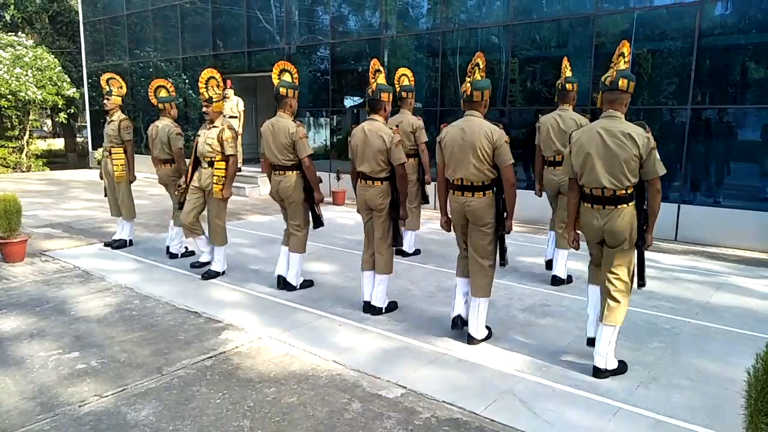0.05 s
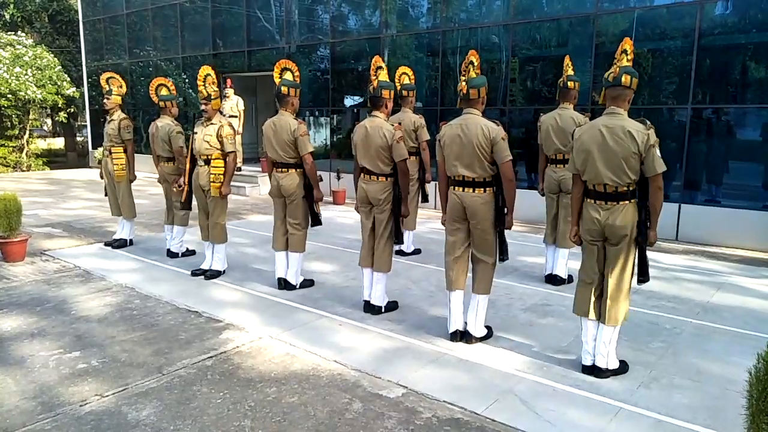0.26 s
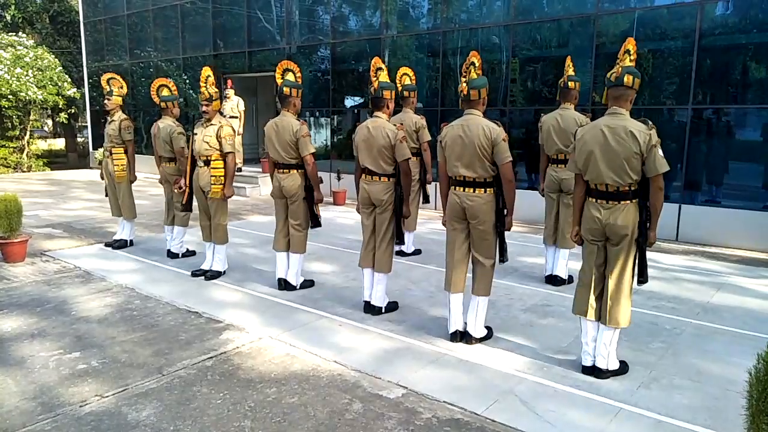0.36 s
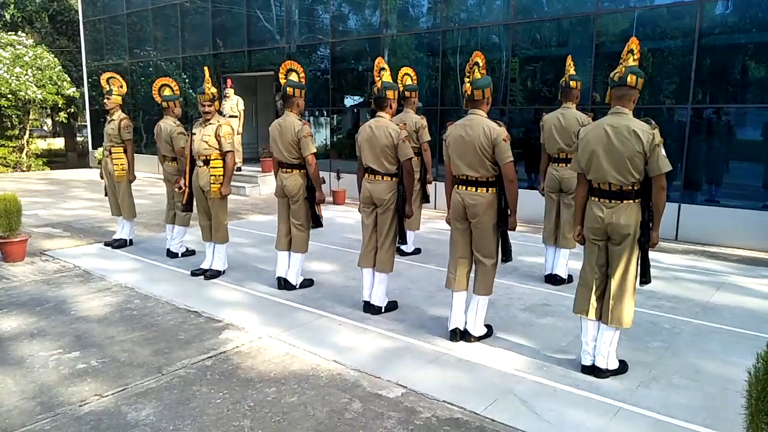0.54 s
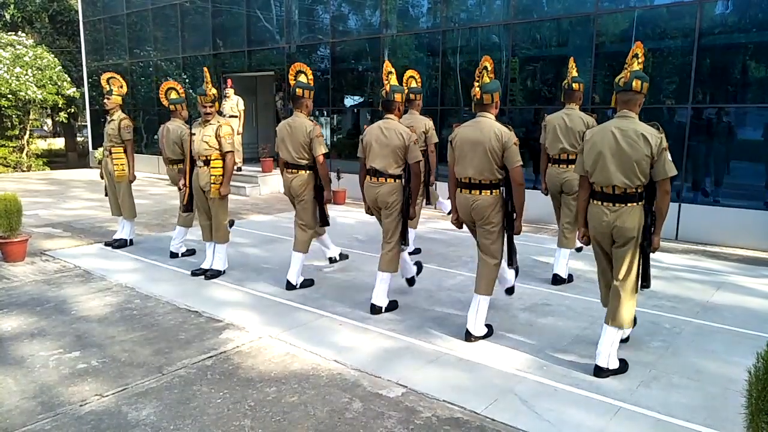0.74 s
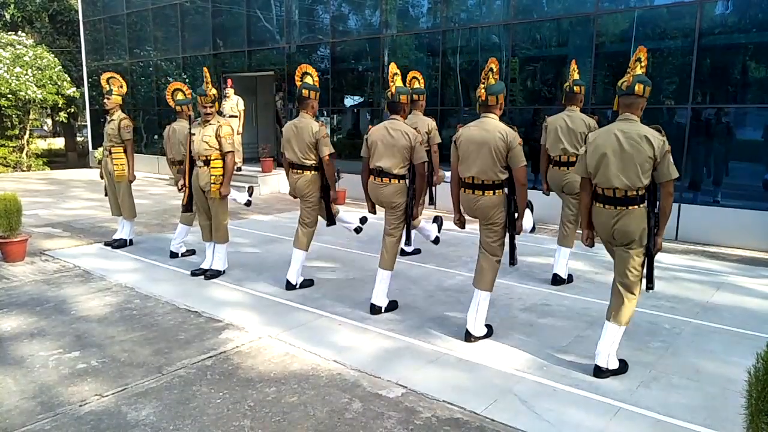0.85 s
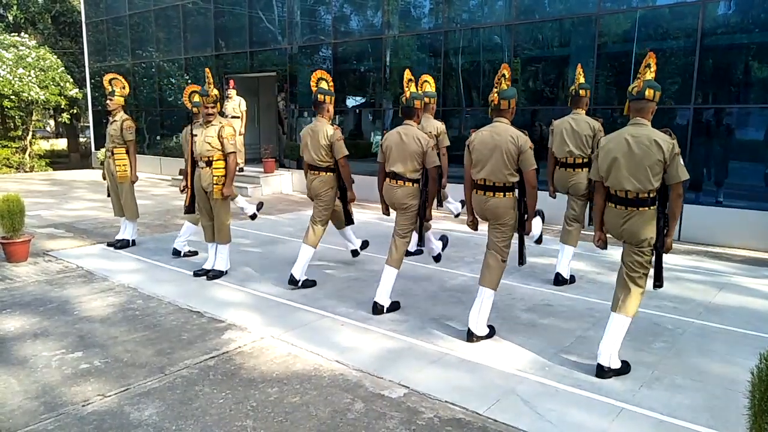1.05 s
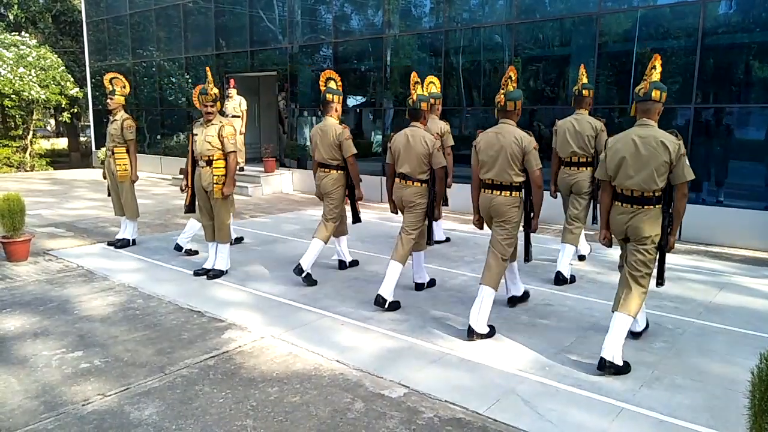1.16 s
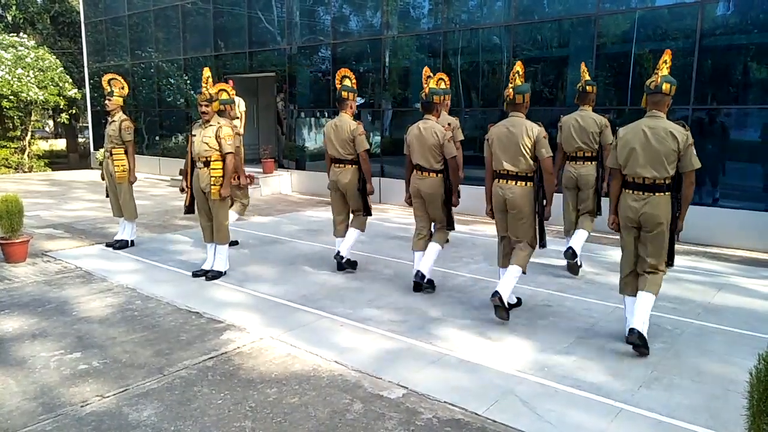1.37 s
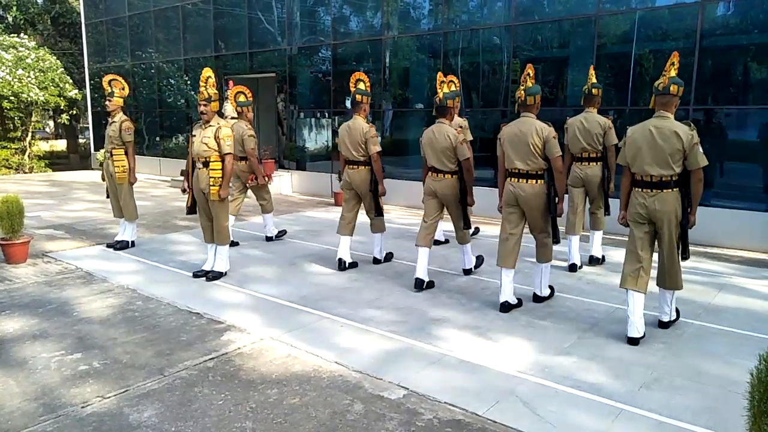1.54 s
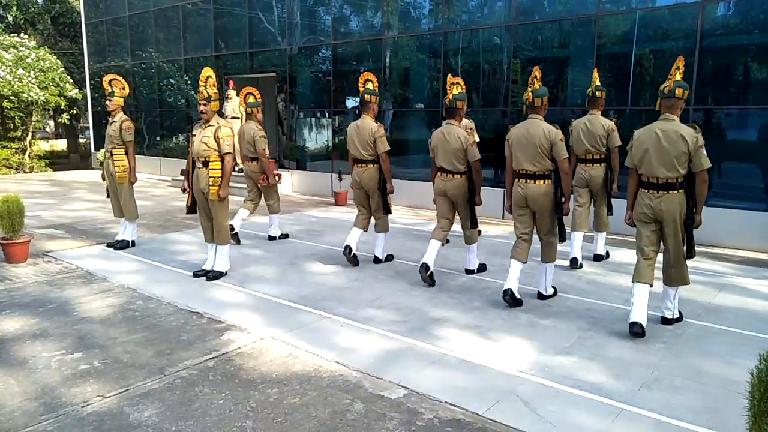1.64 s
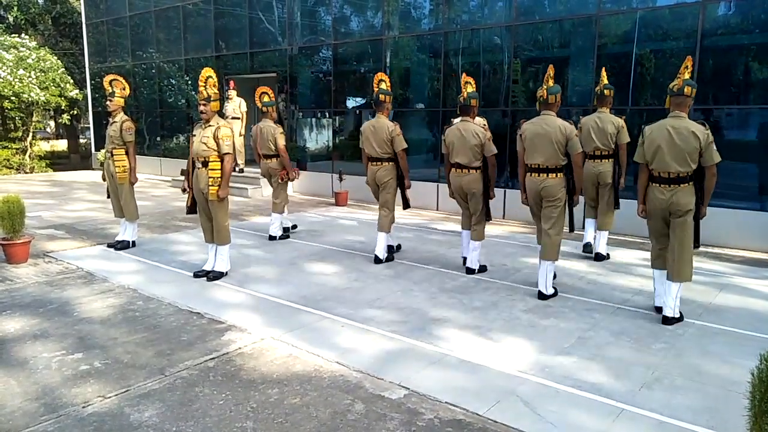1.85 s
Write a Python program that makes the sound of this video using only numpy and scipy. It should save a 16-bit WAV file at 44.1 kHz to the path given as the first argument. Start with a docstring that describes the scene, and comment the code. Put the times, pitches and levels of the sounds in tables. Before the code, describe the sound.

Two sharp group boot stamps ring across an outdoor yard, followed by soft footsteps.

```python
"""Drill squad on a paved yard

The squad stamps twice, boots landing milliseconds apart; each sole thuds, claps and cracks.
A glass front throws the stamps back and the yard rings on. Lighter steps, scuffs and a chink of
metal follow as the squad moves off, over a low outdoor rumble and a distant bird."""
import sys
import numpy as np
from scipy import signal
from scipy.fft import rfft, irfft, next_fast_len
from scipy.io import wavfile
from scipy.ndimage import uniform_filter1d

SR = 44100
rng = np.random.default_rng(int(sys.argv[2]) if len(sys.argv) > 2 else 0)


def output_pcm(signal):
    """Save a mono or channel-first signal as 16-bit PCM at the path in sys.argv[1].

    Samples are clipped to [-1, 1] before scaling.
    """
    pcm = np.clip(np.atleast_2d(signal).T, -1, 1) * 32767
    wavfile.write(sys.argv[1], SR, np.round(pcm).astype(np.int16))


N = 83790

# The five parts of a footfall: thud, clap, knock, crack, grit. Each row: low and high edge in Hz,
# decay in seconds, ring level in dB, yard reverb level in dB, yard reverb time (T60) in seconds.
BOOT_PARTS = [(68.3, 446, 0.0061, -25.5, -10, 0.46), (623, 1315, 0.0022, -10.5, -12.5, 0.62),
              (1296, 2996, 0.0013, -11, -8.5, 0.91), (3164, 5330, 0.0015, -19.5, -14, 1),
              (6020, 14100, 0.0019, -14, -10.5, 1)]
# Tone of a boot stamped on paving. Each row: frequency in Hz, gain in dB.
STAMP_EQ = [(60, -19), (140, 2), (280, -1), (390, -2), (500, -9.5), (640, -3.5), (820, -0.5), (1000, -9.5),
            (1300, -18), (1700, -11.5), (2000, -8.5), (2600, -16), (3300, -8.5), (4100, 2), (5000, -2.5),
            (5700, -14), (7000, -22.5), (9000, -29), (13000, -21.5), (16000, -23)]
# Hollow tone of a light step or scuff. Each row: frequency in Hz, gain in dB.
STEP_EQ = [(60, -3.5), (150, -4.5), (300, 4.5), (480, -27), (620, 0.5), (740, 0.5), (920, -1), (1250, -32),
           (1650, -13), (2000, -5.5), (2170, -13), (2350, -10.5), (2750, -12), (3400, -6.5), (4400, -2),
           (5100, -6), (5800, -20), (7000, -22), (8800, -26.5), (10500, -23.5), (16000, -25.5)]


def stamps(push_s=0.0016, push_db=-2, pitch_spread=0.02):
    """The squad's boots come down almost together, each with its own pitch and a push of air."""
    # Each row: start in seconds, decay multiplier, then thud, clap, knock, crack and grit in dB.
    landings = [(0.2086, 1.55, -23, -17, -22.5, -24, -36.5), (0.2319, 0.72, -22, -25, -30.5, -24, -38),
                (0.2337, 0.32, -26, -41, -26, -27, -36), (.2380, 1.2, -25.5, -26.5, -26, -37, -42),
                (.2478, 1.7, -22, -17.5, -31.5, -28, -48), (0.2492, 0.53, -23, -21, -21, -26, -37),
                (0.2529, 1.16, -24.5, -26.5, -27, -35, -46), (0.26, 1.2, -27, -31, -32, -28, -37),
                (0.2689, 1.1, -26.5, -49, -25, -30.5, -48), (0.2706, 0.35, -37, -28.5, -25.5, -26.5, -34),
                (0.2771, 0.73, -36.5, -42, -37.5, -30, -39.5), (1.2681, 2.7, -25, -26.5, -28.5, -26.5, -46),
                (1.2718, 0.53, -32, -28, -23.5, -23, -36), (1.3162, 0.2, -23.5, -29, -24.5, -19.5, -49),
                (1.3184, 0.42, -26.5, -31, -22, -29, -36.5), (1.3248, 1.14, -25, -30, -32, -35, -35.5),
                (1.3322, 0.49, -32, -65, -46, -30, -33), (1.3380, 0.37, -22, -25, -22.5, -24.5, -45.5),
                (1.3428, 1.54, -24.5, -25, -25, -36, -36.5), (1.3627, 1.5, -28, -30.5, -31.5, -34.5, -36)]
    out = np.zeros(N)
    age = np.arange(4096) / SR / push_s
    push = np.e * age * (1 - age / 2) * np.exp(-age)  # the weight under the thud
    for start, stretch, *levels_db in landings:
        eq = np.array(STAMP_EQ) * [np.exp(pitch_spread * rng.standard_normal()), 1]
        add(out, start, footfall(levels_db, eq, stretch) + undb(levels_db[0] + push_db) * push)
    return out


def footfall(levels_db, eq, stretch, roll_s=0, ring_s=0.019, strike=3.92):
    """One sole meets the paving: a sharp contact or a soft roll, a short crush, a ring."""
    t = np.arange(4096) / SR
    _, _, decay, ring_db, _, _ = np.array(BOOT_PARTS).T[:, :, None]
    envelope = np.exp(-t / (decay * stretch)) + undb(ring_db) * np.exp(-t / (ring_s * stretch))
    bursts = rng.standard_normal((len(BOOT_PARTS), len(t))) * envelope
    if roll_s:
        bursts *= 1 - np.exp(-t / roll_s)
    else:
        bursts[:, 0] += strike
    parts = [band(x, *row[:2]) for x, row in zip(colour(bursts, eq), BOOT_PARTS)]
    # Each level sets the part's energy, as if spread over 10 ms.
    return sum(undb(db) * x / np.sqrt(np.sum(x ** 2) / (.01 * SR)) for x, db in zip(parts, levels_db))


def steps(roll_s=0.0007):
    """Light steps and heel taps roll onto the ground, the longer ones more slowly."""
    # Each row: start in seconds, decay multiplier, then thud, clap, knock, crack and grit in dB.
    landings = [(.836, 2.9, -53, -59.5, -58, -53, -52), (.854, 2.4, -55.5, -63.5, -63.5, -43, -61),
                (0.889, 3, -62, -64, -63, -68, -67), (1.6325, 1.1, -48, -44.5, -40.5, -66, -47.5),
                (1.683, 1.1, -54, -42.5, -45.5, -54, -63), (1.701, 8, -46, -47, -56, -53, -74),
                (1.726, 4.7, -41.5, -45, -42.5, -45, -57), (1.751, 3.1, -42, -44.5, -45, -42.5, -62.5),
                (1.793, 2.5, -46, -83, -44.5, -53, -67.5), (1.821, 1.14, -56, -82, -49.5, -53, -67),
                (1.8253, 0.16, -51, -70, -48, -43, -62)]
    out = np.zeros(N)
    for start, stretch, *levels_db in landings:
        add(out, start, footfall(levels_db, STEP_EQ, stretch, roll_s * stretch))
    return out


def scuffs(grain_db=3):
    """Soles slide and trousers swish: grainy friction that swells and dies away."""
    # Each row: start, rise and decay in seconds, then knock, crack and grit in dB.
    slides = [(.630, 0.0084, 0.13, -58, -52, -61.5), (.775, 0.023, 0.049, -58, -50, -61.5),
              (0.829, 0.028, 0.021, -61.5, -44, -53.5), (.86, 0.033, 0.17, -70, -61.5, -67),
              (1.304, 0.0069, 0.0023, -42, -31, -41), (1.372, 0.0086, 0.0099, -28, -30, -65),
              (1.632, 0.024, 0.037, -46.5, -42, -52), (1.715, 0.0039, 0.065, -67, -41, -53),
              (1.83, 0.018, 0.053, -70, -50.5, -61)]
    out, t = np.zeros(N), np.arange(SR // 2) / SR
    for start, rise, decay, *levels_db in slides:
        grain = unit(uniform_filter1d(rng.standard_normal(len(t)), size=90))
        rub = colour(rng.standard_normal(len(t)) * undb(grain_db * grain), STEP_EQ)
        swell = np.minimum(t / rise, 1) * np.exp(-np.maximum(t - rise, 0) / decay)
        parts = [undb(db) * unit(band(rub, *row[:2])) for row, db in zip(BOOT_PARTS[2:], levels_db)]
        add(out, start, swell * sum(parts))
    return out


def rings(wander_hz=40, rise_s=0.0054):
    """Narrow, hollow resonances linger after a boot lands."""
    # Each row: start and decay in seconds, pitch in Hz, level in dB.
    resonances = [(.209, 0.019, 822, -22.5), (.712, .03, 2030, -52.5), (.785, 0.084, 1988, -55.5),
                  (.825, .04, 2350, -53), (.842, 0.017, 787, -52), (.868, 0.031, 701, -55.5),
                  (1.27, 0.02, 739, -25.5), (1.682, 0.012, 871, -39.5)]
    out, t = np.zeros(N), np.arange(SR // 4) / SR
    for start, decay, hz, db in resonances:
        tone = sine(hz + wander_hz * drift(len(t)))
        envelope = (1 - np.exp(-t / rise_s)) * np.exp(-t / decay)
        add(out, start, undb(db) * envelope * tone)
    return out


def ticks():
    """Heel plates and gear click, with no body below the treble."""
    # Each row: start and decay in seconds, low and high edge in Hz, level in dB.
    contacts = [(.2092, 0.0013, 13000, 16000, -27.5), (.2090, 0.00096, 4400, 6800, -23.5),
                (.7612, 0.0024, 4500, 4960, -41), (.7615, 0.0011, 5000, 9200, -49)]
    out, t = np.zeros(N), np.arange(SR // 20) / SR
    for start, decay, lo, hi, db in contacts:
        click = band(rng.standard_normal(len(t)) * np.exp(-t / decay), lo, hi)
        add(out, start, undb(db) * click / np.sqrt(np.sum(click ** 2) / (decay * SR)))
    return out


def chinks():
    """Small metal fittings brush together in a brief, bright chink."""
    # Each row: start and length in seconds, level in dB.
    touches = [(1.542, .018, -35)]
    # Tone of the fittings. Each row: frequency in Hz, gain in dB.
    metal_eq = [(3000, -31), (5000, 6), (7000, -20), (8800, -9.5), (10000, 2.5), (11000, -4.5), (12800, 1),
                (14300, -2), (15500, -5)]
    out = np.zeros(N)
    for start, length, db in touches:
        swell = np.hanning(int(length * SR))
        shimmer = unit(colour(rng.standard_normal(SR), metal_eq))[:len(swell)]
        add(out, start, undb(db) * swell * shimmer)
    return out


def echoes(focus_db=9, width_hz=1095):
    """The glass front throws back thinner slaps, each focused around one frequency."""
    # Each row: start in seconds, decay multiplier, level in dB, focus centre in Hz.
    slaps = [(0.293, 1.9, -38, 3700), (0.3250, 0.7, -36, 1920), (.335, 0.59, -33, 1990),
             (.342, 0.88, -39, 2100), (0.347, 2, -34.5, 2490), (0.3665, 0.83, -29.5, 2540),
             (0.3806, 0.17, -30.5, 2570), (.389, 0.25, -32.5, 2400), (0.3979, 0.44, -31, 2500),
             (0.415, 1.5, -34, 2560), (0.429, 1, -39, 3400), (0.443, 0.83, -37.5, 2770),
             (1.382, 1.4, -32, 1770), (1.4053, 1.7, -27.5, 1420), (1.413, 0.99, -35.5, 1760),
             (1.429, 1.9, -41.5, 1750), (1.4335, 1.4, -32.5, 2140), (1.456, 0.22, -29, 2670),
             (1.461, 1.1, -37.5, 2440), (1.478, 0.52, -34, 2650), (1.483, 7.7, -35.5, 3300),
             (1.496, 2.8, -31.5, 2600)]
    # Balance of a slap: offsets in dB for thud, clap, knock, crack and grit.
    balance_db = [-8.5, -13, -7, -11, -27]
    out = np.zeros(N)
    for start, stretch, db, hz in slaps:
        slap = footfall(db + np.array(balance_db), STAMP_EQ, stretch)
        focus = band(slap, hz - width_hz / 2, hz + width_hz / 2)
        add(out, start, slap + undb(focus_db) * focus)
    return out


def rattle(x, count=14, delay_s=.14, spread_s=0.079, level_db=-16.5):
    """The building's edges, likely its window frames, return the stamps as tiny, separate clicks."""
    response = np.zeros(SR // 2)
    for delay in np.clip(delay_s + spread_s * rng.standard_normal(count), .04, .4):
        add(response, delay, np.ones(1) / np.sqrt(count))
    return undb(level_db) * band(signal.fftconvolve(x, response)[:N], lo_hz=2004, hi_hz=4500)


def yard_reverb(x, build_s=0.027):
    """Scattered reflections build up, then fade at a different rate in each band."""
    # Tone of the yard's tail. Each row: frequency in Hz, gain in dB.
    yard_eq = [(100, -6), (250, -2), (430, 0.5), (800, -1.5), (1250, 1), (1800, -3), (2350, -0.5),
               (3000, -1), (4500, -9), (6000, -0.5), (10000, -3), (15000, -11)]
    t = np.arange(SR) / SR
    response = np.zeros(SR)
    for lo, hi, _, _, db, t60 in BOOT_PARTS:
        envelope = (1 - np.exp(-t / build_s)) * np.exp(-np.log(1000) * t / t60)
        tail = band(rng.standard_normal(SR), lo, hi) * envelope
        response += undb(db) * unit(tail) * np.sqrt(2 * (hi - lo)) / SR
    return signal.fftconvolve(x, colour(response, yard_eq))[:N]


def outdoors():
    """A bed of low rumble and a faint hiss of air."""
    # Tone of each layer. Each row: frequency in Hz, gain in dB.
    rumble_eq = [(20, -13.5), (40, -8), (65, -1), (95, 5), (130, -1), (200, -10.5), (300, -16), (380, -30),
                 (460, -39), (900, -52.5)]
    air_eq = [(200, 2.5), (500, -5), (700, 3), (950, 3.5), (2000, 4), (3500, -5), (4700, -7.5), (5800, -14),
              (10000, -16), (16000, -15)]
    # Fader moves for each layer. Each row: time in seconds, level in dB.
    rumble_fader = [(0, -34), (.1, -37.5), (.35, -38.5), (.65, -42.5), (.95, -44.5), (1.2, -43),
                    (1.55, -43.5), (1.9, -50.5)]
    air_fader = [(0, -56.5), (.2, -55), (.65, -60.5), (1.9, -58)]
    rumble = unit(colour(rng.standard_normal(N), rumble_eq)) * fader(rumble_fader)
    air = unit(colour(rng.standard_normal(N), air_eq)) * fader(air_fader)
    return rumble + air


def hoots(length_s=0.078):
    """A hollow note, probably a distant bird, repeats twice a second."""
    # Each row: start in seconds, pitch in Hz, level in dB.
    calls = [(.075, 652, -64), (.565, 731, -59), (1.07, 705.5, -63.5), (1.59, 706, -58)]
    out = np.zeros(N)
    for start, hz, db in calls:
        add(out, start, undb(db) * note(length_s, hz, hz, waver=0.044))
    return out


def whistles():
    """Thin, wavering high tones sit far in the background."""
    # Each row: start and length in seconds, first and last pitch in Hz, level in dB.
    glides = [(0.005, 0.063, 5160, 5250, -67), (0.01, 0.047, 4300, 4340, -73),
              (.08, 0.036, 5000, 4880, -83), (.93, 0.127, 4500, 4440, -68.5), (1.06, 0.15, 4560, 4590, -79),
              (1.17, 0.12, 4750, 5030, -74.5)]
    out = np.zeros(N)
    for start, length, start_hz, end_hz, db in glides:
        add(out, start, undb(db) * note(length, start_hz, end_hz, waver=0.0082))
    return out


def note(length_s, start_hz, end_hz, waver):
    """A soft gliding tone that wavers by a fraction of its pitch."""
    swell = signal.windows.tukey(int(length_s * SR), .8)
    glide_hz = np.linspace(start_hz, end_hz, len(swell))
    return swell * sine(glide_hz * (1 + waver * drift(SR)[:len(swell)]))


def sine(hz):
    """A tone with an rms of 1 that follows a pitch curve."""
    return np.sqrt(2) * np.sin(2 * np.pi * np.cumsum(hz) / SR)


def drift(samples):
    """A quick random wobble with an rms of 1."""
    return unit(band(rng.standard_normal(samples), lo_hz=10, hi_hz=70))


def colour(x, points):
    """Minimum-phase EQ through (Hz, dB) points, so attacks stay sharp."""
    length = x.shape[-1]
    size = 2 * next_fast_len(length)
    hz, db = np.array(points, float).T
    gain = undb(np.interp(np.log(np.fft.rfftfreq(size, 1 / SR) + 1), np.log(hz), db))
    cepstrum = irfft(np.log(gain))
    cepstrum[1:size // 2] *= 2
    cepstrum[size // 2 + 1:] = 0
    return irfft(rfft(x, size) * np.exp(rfft(cepstrum)))[..., :length]


def band(x, lo_hz, hi_hz):
    """Third-order band-pass."""
    size = 2 * next_fast_len(len(x))
    hz = np.fft.rfftfreq(size, 1 / SR) + 1
    s = 1j * (hz ** 2 - lo_hz * hi_hz) / (hz * (hi_hz - lo_hz))
    return irfft(rfft(x, size) / ((s + 1) * (s * s + s + 1)))[:len(x)]


def fader(points):
    """Gain along (seconds, dB) points."""
    return undb(np.interp(np.arange(N) / SR, *np.array(points).T))


def add(out, start_s, x):
    """Mix x into out from a given time."""
    i = int(start_s * SR)
    out[i:i + len(x)] += x[:len(out) - i]


def undb(db):
    """Decibels to gain."""
    return 10 ** (np.asarray(db) / 20)


def unit(x):
    """Scale to an rms of 1."""
    return x / np.sqrt(np.mean(x ** 2))


def suppress_noise(x, size=512, max_cut_db=-13.5):
    """A soft spectral gate turns down each frequency while it stays under the threshold."""
    # Each row: frequency in Hz, threshold in dB per Hz.
    threshold = [(100, -86.5), (300, -84.5), (500, -98.5), (750, -90.5), (1200, -84.5), (2000, -87.5),
                 (2900, -89), (4500, -100), (6500, -103), (16000, -106)]
    threshold_hz, threshold_db = np.array(threshold, float).T
    hz, _, spectrum = signal.stft(x, SR, nperseg=size, scaling="psd")
    power = uniform_filter1d(2 * abs(spectrum) ** 2, size=3, axis=0)
    power = uniform_filter1d(power, size=3, axis=1)
    limit = undb(np.interp(np.log(hz + 1), np.log(threshold_hz), threshold_db))[:, None] ** 2
    opening = power ** 2 / (power ** 2 + limit ** 2)
    gated = spectrum * undb(max_cut_db * (1 - opening))
    return signal.istft(gated, SR, nperseg=size, scaling="psd")[1][:N]


def scene():
    """Boots and their echoes feed the yard's reverb; ticks and background stay dry. Mono."""
    squad = stamps()
    boots = squad + echoes() + rattle(squad) + steps() + scuffs() + rings() + chinks()
    return (boots + yard_reverb(boots) + ticks() + outdoors() + whistles() + hoots())[None]


def record(dry):
    """The recorder suppresses faint noise and cuts the top above 16 kHz."""
    lowpass = signal.ellip(10, .2, 80, 16000, fs=SR, output="sos")
    return signal.sosfilt(lowpass, suppress_noise(dry[0])[None])


dry = scene()
out = record(dry)
output_pcm(out)
```